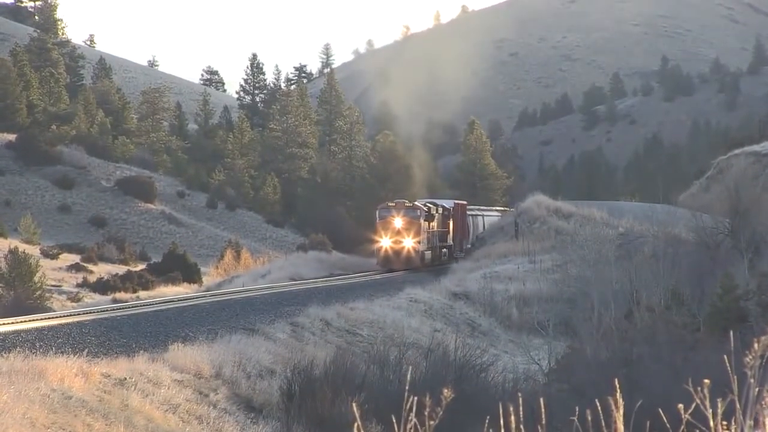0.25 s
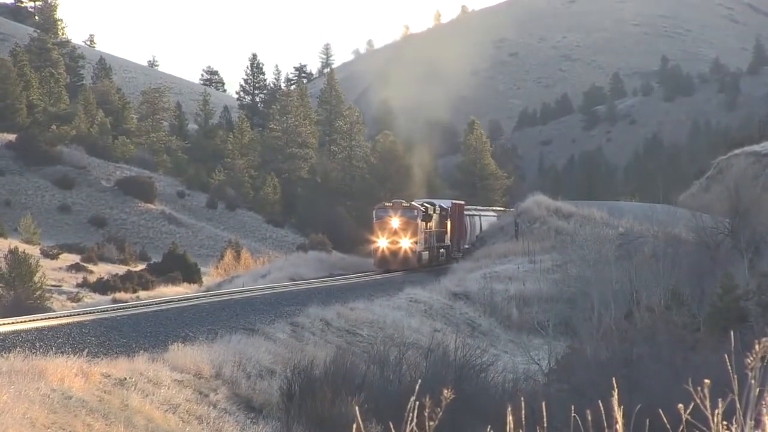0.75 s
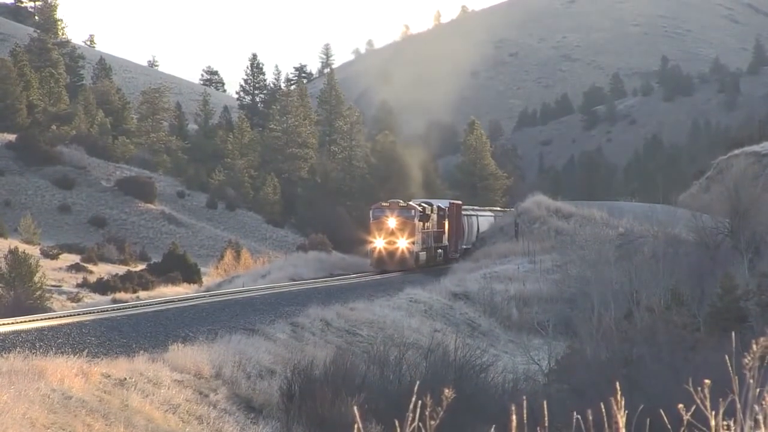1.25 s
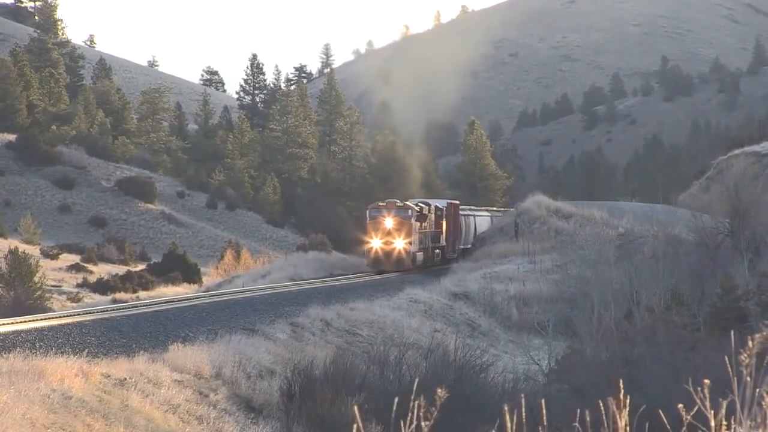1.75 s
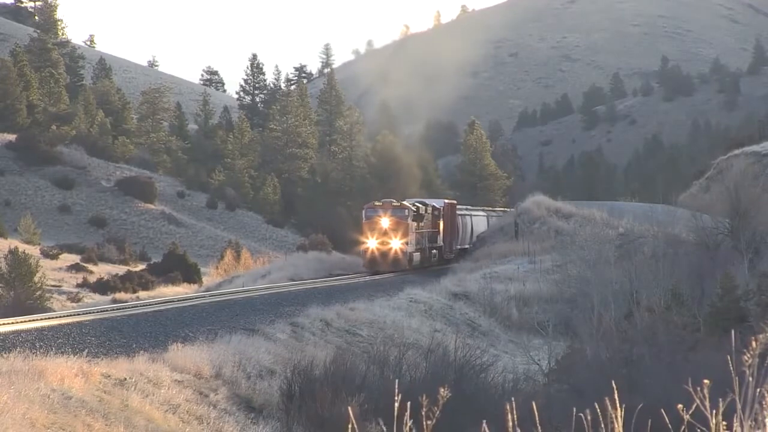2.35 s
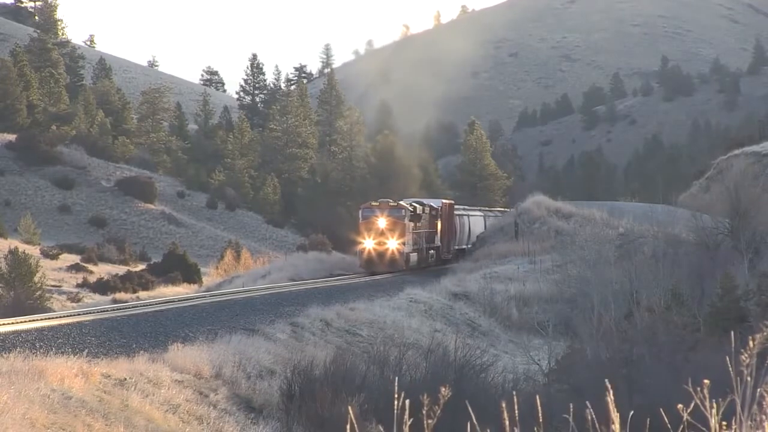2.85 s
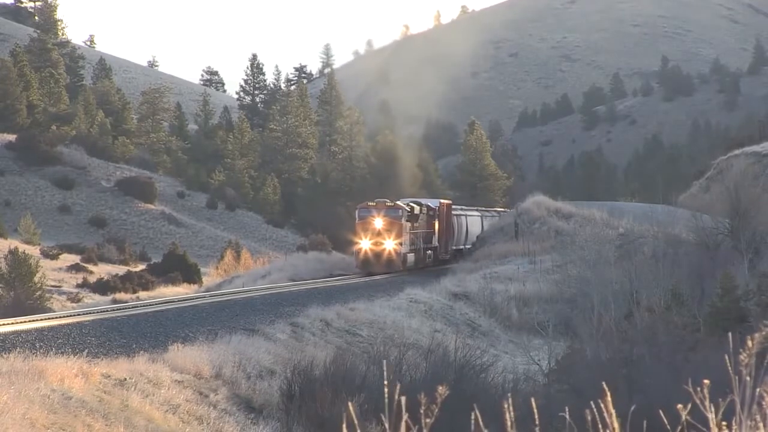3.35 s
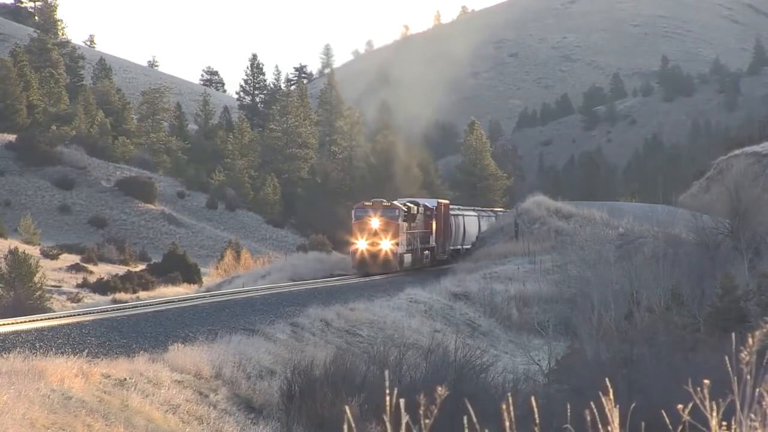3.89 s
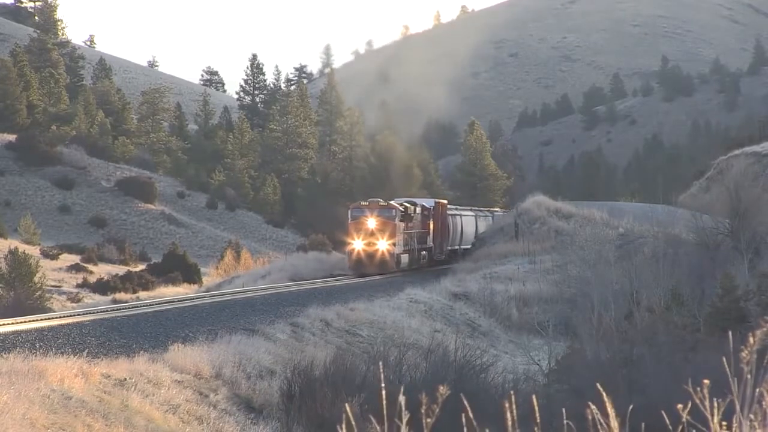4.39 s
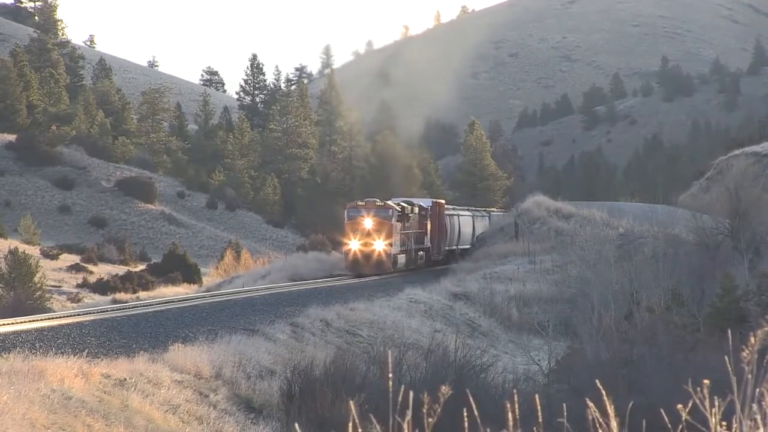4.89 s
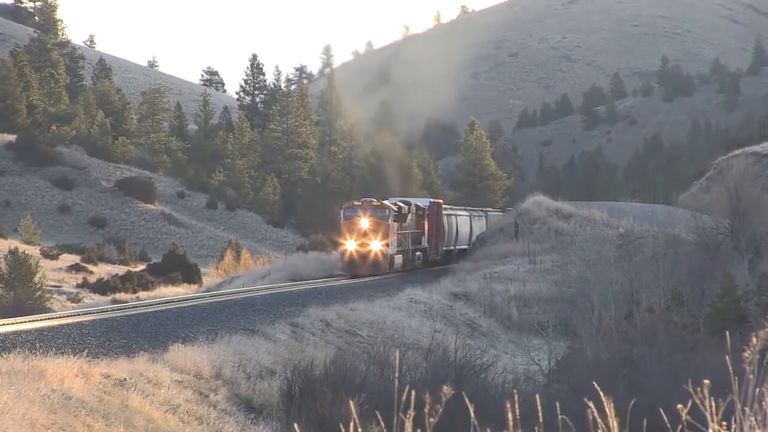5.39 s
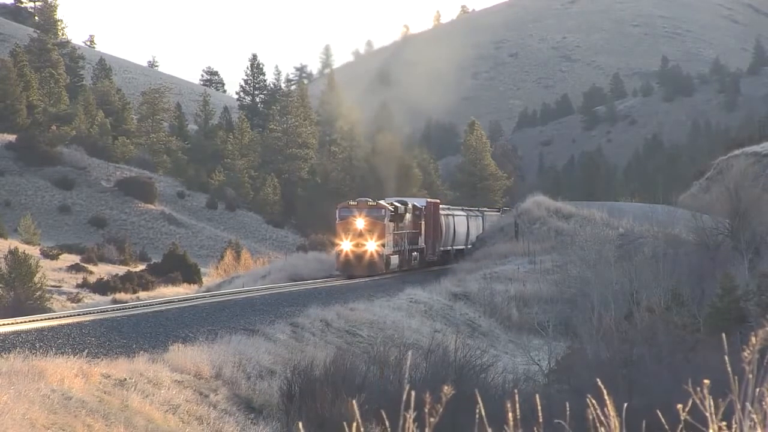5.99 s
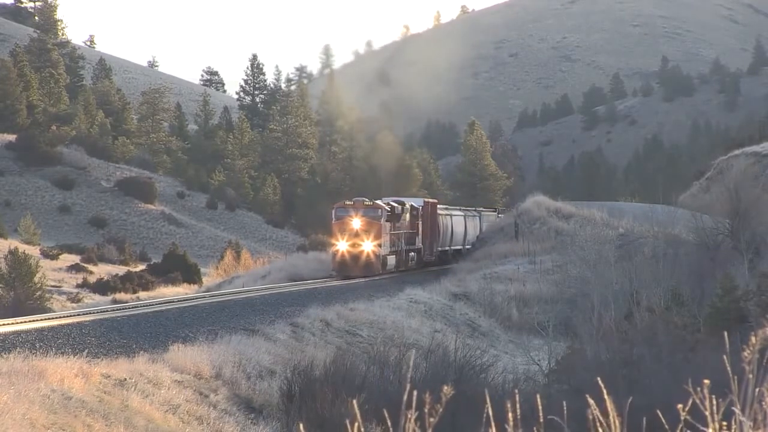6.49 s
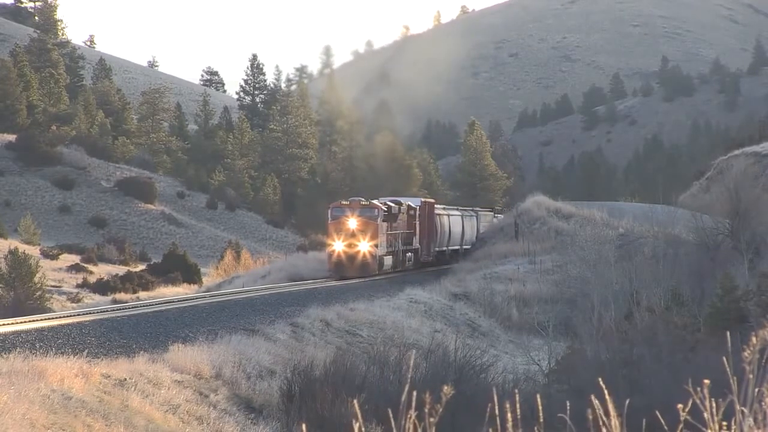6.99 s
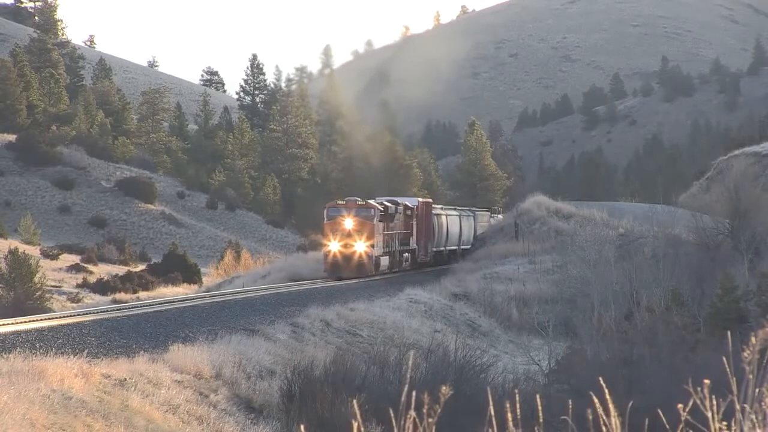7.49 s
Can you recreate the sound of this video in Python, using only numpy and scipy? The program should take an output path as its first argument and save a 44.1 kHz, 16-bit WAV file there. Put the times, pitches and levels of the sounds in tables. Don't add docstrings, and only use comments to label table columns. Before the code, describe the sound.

Fast, uneven diesel firings pulse beneath a steady low-mid roar, heard from a fixed trackside spot in open country. The train clears a cutting around three seconds and becomes fuller, then its fans turn throaty on the curve and it ends at its loudest. Faint grass brushing and small ticks fade as the breeze dies. A quick, quiet bird trill and a thin wavering turbo whistle appear over the engines, with slight microphone hiss.

```python
import sys
import numpy as np
from scipy import signal
from scipy.fft import rfft, irfft, next_fast_len
from scipy.io import wavfile
from scipy.ndimage import uniform_filter1d

SR = 44100
rng = np.random.default_rng(int(sys.argv[2]) if len(sys.argv) > 2 else 0)


def waveform_to_disk(signal):
    frames = np.transpose(np.atleast_2d(signal))
    scaled = np.clip(frames, -1, 1) * 32767
    samples = np.round(scaled).astype(np.int16)
    wavfile.write(sys.argv[1], SR, samples)


def to_linear_factor(level_db):
    exponent = np.asarray(level_db, float) / 20
    return 10 ** exponent


N = 341334
TIME = np.arange(N) / SR
PAD = next_fast_len(N + SR // 2)
FREQ = np.arange(PAD // 2 + 1) * SR / PAD + 1e-6


def curves(table):
    s, *columns = np.transpose(table)
    return [np.interp(TIME, s, c) for c in columns]


def unit(x):
    return x / np.sqrt(np.mean(x ** 2))


def through(x, response):
    return irfft(rfft(x, PAD) * response, PAD)[:N]


def noise():
    return rng.standard_normal(N)


def low_pass(hz, order):
    return 1 / (1 + (FREQ / hz) ** order)


def colour(spectrum):
    hz, db = np.transpose(spectrum)
    return to_linear_factor(np.interp(np.log(FREQ), np.log(hz), db))


def ring(hz, width):
    return 1j * FREQ * width / (hz ** 2 - FREQ ** 2 + 1j * FREQ * width)


def tone(hz):
    return np.sin(2 * np.pi * np.cumsum(hz) / SR)


def walk(rate):
    levels = rng.standard_normal(int(N / SR * rate) + 3)
    quarters = np.arange(4 * len(levels)) / 4
    ramps = uniform_filter1d(np.interp(quarters, np.arange(len(levels)), levels), size=3)
    return 1.3 * np.interp(TIME * rate * 4, np.arange(len(ramps)), ramps)


CYCLE_HZ = 8.9254
# crank angle/deg of 720, level/dB
CYLINDERS = [(57.8, 2.7), (96.5, 3.8), (174.0, -4.2), (241.3, -1.9), (287.0, -1.9), (337.3, -5.5),
             (427.4, 2.5), (479.5, -3.0), (538.2, 5.1), (576.2, 4.4), (676.1, 2.6), (706.7, -4.5)]


def firings(scatter_db, drift_db, jitter_s):
    angle, db = np.transpose(CYLINDERS)
    cycles = np.arange(int(N / SR * CYCLE_HZ) + 1)[:, None]
    chance = rng.standard_normal((len(cycles), len(angle), 3))
    drift = 2 * uniform_filter1d(chance[..., 2], size=4, axis=0)
    place = ((cycles + angle / 720) / CYCLE_HZ + jitter_s * chance[..., 0]) * SR
    size = to_linear_factor(db + scatter_db * chance[..., 1] + drift_db * drift)
    place = np.clip(place, 0, PAD - 1).astype(int)
    return np.bincount(place.ravel(), size.ravel(), PAD)[:N]


# f/Hz, width/Hz, signed gain
STACK = [(55.14, 8, -.1), (78.59, 8, -.293), (145.0, 23.7, .128), (191.1, 10.7, .037)]
# t/s, level/dB
NEARING = [
    (0, -4.5),
    (1.7, -3),
    (3.1, -0.5),
    (5.6, 0),
    (7.74, 2),
]
MIC_CUT_HZ = 40
BEAT_DB, DEEP_DB = -33, -41
DEEP_FOLLOW = .1
DRIFT_S, DRIFT_PEAK_S, DRIFT_DB = 8.2, 6.9, 1


def exhaust(pulses):
    slope = 1j * FREQ / MIC_CUT_HZ
    bass_cut = (slope ** 2 / (slope ** 2 + np.sqrt(2) * slope + 1)) ** 2
    rings = sum(gain * ring(hz, width) for hz, width, gain in STACK)
    stack = bass_cut * rings * low_pass(420, 4)
    deep = low_pass(66, 16)
    near_db = curves(NEARING)[0]
    drift_db = DRIFT_DB * np.cos(2 * np.pi * (TIME - DRIFT_PEAK_S) / DRIFT_S)
    throb = to_linear_factor(DEEP_DB + DEEP_FOLLOW * near_db + drift_db) * unit(through(pulses, stack * deep))
    beat = to_linear_factor(BEAT_DB + near_db + 1.0) * unit(through(pulses, stack * (1 - deep)))
    return throb + beat


# f/Hz, share
ROAR_FOLLOW = [(100, 0.41), (300, 0.19), (480, .8), (750, -0.5), (1200, .6), (2500, .2), (5000, -0.0058)]
# t/s, f/Hz
GROUND_DIP = [
    (0, 1048),
    (1.2, 1026),
    (2.4, 795),
    (3.3, 670),
    (5.6, 1034),
    (6.4, 1186),
    (7.74, 1237),
]
DIP_DB, DIP_OCTAVES = -1, 0.14
# t/s, f/Hz, length/s, level/dB
POCKETS = [(.45, 2600, .2, 4.5), (.2, 980, 0.45, 2), (2.2, 1150, .4, 3.5), (2.67, 3000, 0.28, 4.5),
           (3.0, 1020, 0.42, -2.5), (3.6, 2700, 0.68, -2.5), (3.5, 1500, .4, -2), (3.6, 320, .5, -0.5),
           (4.297, 4400, .5, 1), (4.85, 2800, .25, -2.5), (1.7, 3100, .4, 1.5), (6.4, 2100, .5, 1),
           (5.7, 950, 0.31, -2.5), (5.4, 1550, 0.55, 3.5), (5.2, 2400, 0.41, 1.5), (7.1, 1000, 0.76, 3),
           (7.74, 3000, .3, 4.5)]
POCKET_OCTAVES = .5


def swell(hz):
    s = TIME[::256]
    centres, shares = np.transpose(ROAR_FOLLOW)
    db = np.interp(np.log(hz), np.log(centres), shares) * np.interp(s, *np.transpose(NEARING))
    dip_hz = np.interp(s, *np.transpose(GROUND_DIP))
    db += DIP_DB * np.exp(-(np.log2(hz / dip_hz) / DIP_OCTAVES) ** 2)
    db -= db.mean()
    for at, centre, length, gain_db in POCKETS:
        octaves = np.log2(hz / centre) / POCKET_OCTAVES
        db += gain_db * np.exp(-((s - at) / length) ** 2 - octaves ** 2)
    return np.interp(TIME, s, db)


# f/Hz, level/dB per Hz
ROAR = [(40, -16), (70, -6), (150, -1), (240, 0.5), (330, -7), (520, -7.5), (750, -11.5), (950, -15),
        (1300, -22.5), (1700, -26.5), (2500, -30), (4600, -40.5), (5450, -53), (7000, -64)]


def roar(pulses, puff=.09, shimmer_db=.4, flicker_db=1.3):
    beat = unit(through(pulses - pulses.mean(), ring(40, 50)))
    gas = rfft(noise() * (1 + puff * beat), PAD) * colour(ROAR)
    octave = np.log2(FREQ / 480)
    out = np.zeros(N)
    for step in np.arange(-11, 14):
        band = np.clip(1 - abs(3 * octave - step), 0, 1)
        db = swell(480 * 2 ** (step / 3)) + shimmer_db * walk(1.5) + flicker_db * walk(4)
        out += to_linear_factor(db) * irfft(gas * band, PAD)[:N]
    return to_linear_factor(-44.5) * unit(out)


# f/Hz, width/Hz, level/dB
HUMS = [(70.3, 9.5, -53.5), (96.6, 1.5, -52), (127.8, 4.7, -60.5), (368.8, 21, -61.5), (629, 26, -66),
        (1046, 100, -68.5), (1255.5, 100, -66), (1430, 49, -71.5)]


def hums(waver_db=1.5):
    source = noise()
    out = np.zeros(N)
    for hz, width, db in HUMS:
        band = unit(through(source, ring(hz, width) ** 2))
        out += to_linear_factor(db + swell(hz) + waver_db * walk(1.2)) * band
    return out


def ground(x, share=0.34):
    late = np.interp(TIME - .5 / curves(GROUND_DIP)[0], TIME, x)
    return x + share * through(late, low_pass(1700, 4))


# t/s, f/Hz, level/dB
THROAT = [
    (0, 680, -66),
    (.7, 720, -55.5),
    (1.5, 730, -55.5),
    (2.1, 620, -65),
    (2.8, 460, -59),
    (4.6, 470, -59),
    (5.2, 560, -52.5),
    (7.74, 545, -50.5),
]


def throat(width_hz=80):
    hz, db = curves(THROAT)
    hz = hz * (1 + .05 * walk(3))
    turn = 2 * np.pi * np.cumsum(hz) / SR
    a, b = (through(noise(), low_pass(width_hz, 4)) for _ in range(2))
    return to_linear_factor(db + 0.76 * walk(6.2)) * unit(a * np.cos(turn) + b * np.sin(turn))


# f/Hz, level/dB per Hz
STEMS = [(2500, -5.5), (5000, 7.5), (8000, 2.5), (10000, -4), (12000, -1.5), (15500, -10)]
# t/s, length/s, level/dB, brightness 0-1
GUSTS = [(0, .05, -82, 0.6), (0.326, 0.19, -84, 0.35), (0.798, .12, -90.5, 0.6), (1.02, 0.06, -88, 0.5),
         (1.153, 0.1, -77.5, 0.33), (1.318, .06, -92, 0.4), (1.529, 0.12, -88.5, .4), (1.807, .1, -94, 0.8),
         (2.16, .14, -85.5, .95), (2.42, .06, -88.5, .6), (3.47, .06, -94, .5), (3.59, .09, -85, 0.8),
         (3.771, .1, -88.5, 1), (4.22, 0.1, -87.5, 0.9), (4.83, 0.05, -93, 0.5)]
# t/s, level/dB, f/Hz, width/Hz
TICKS = [(1.7841, -46, 5400, 4500), (1.7841, -46, 10500, 7000), (1.7962, -62, 7800, 2500),
         (1.7995, -52, 8000, 2200), (1.7996, -51, 13500, 6000), (1.8018, -57, 10500, 6000),
         (1.804, -62, 9000, 5000), (3.499, -65, 6800, 3000), (3.604, -68, 8000, 4000),
         (4.309, -68, 6000, 3000), (4.84, -68, 7500, 3000), (5.866, -63, 9300, 1200),
         (6.93, -65, 9000, 2200)]
CALM_DB, CALM_BRIGHT = -102, 0.5
BREEZE_DB, BREEZE_S = 8, 2.4


def grass(crackle_db=2.0):
    crackle = to_linear_factor(crackle_db * rng.exponential(size=N))
    grains = unit(through(noise() * crackle, colour(STEMS)))
    t = TIME[::64]
    gains = np.array([to_linear_factor(db - 10 * ((t - s) / length) ** 2) for s, length, db, _ in GUSTS])
    calm = to_linear_factor(CALM_DB + BREEZE_DB * np.exp(-(t / BREEZE_S) ** 4))
    gain = calm + gains.sum(axis=0)
    bright = (calm * CALM_BRIGHT + np.transpose(GUSTS)[-1] @ gains) / gain
    gain, bright = np.interp(TIME, t, gain), np.interp(TIME, t, bright)
    thick = through(grains, low_pass(7500, 8))
    out = gain * to_linear_factor(7.5 + 1.2 * walk(25)) * (grains - np.clip(bright, 0, 1) * thick)
    after = np.arange(256) / SR
    for s, db, hz, width in TICKS:
        start = int(s * SR)
        decay = np.exp(-np.pi * width * .5 * after)
        out[start:start + 256] += to_linear_factor(db) * decay * np.sin(2 * np.pi * hz * after)
    return out


def peak(s, length, db):
    return to_linear_factor(db - 10 * abs(TIME - s) / length)


TURBO_HZ, TURBO_DB = 1481.5, -86
# t/s, length/s, level/dB
GLINTS = [
    (0.696, .35, -72.5),
    (1.898, .7, -76.5),
    (2.69, 0.1, -64.5),
    (4.498, 0.53, -65),
    (5.496, 0.67, -69.5),
    (7.003, 1.6, -71.5),
]


def turbo():
    hz = TURBO_HZ + 4 * walk(5)
    gain = to_linear_factor(TURBO_DB) + sum(peak(*row) for row in GLINTS)
    return np.sqrt(2) * gain * to_linear_factor(2.0 * walk(6.4)) * tone(hz)


# t/s, start f/Hz, end f/Hz, length/s, level/dB
LEAD_IN = (2.670, 6550, 7700, .028, -80)
# t/s, level/dB
NOTES = [
    (2.804, -83),
    (2.894, -87),
    (2.984, -79),
    (3.071, -77),
    (3.162, -79),
    (3.256, -75),
    (3.347, -75),
    (3.440, -77),
]
NOTE_HZ, NOTE_S = (7570, 5100), .031


def bird():
    out = np.zeros(N)
    for s, start_hz, end_hz, length, db in [LEAD_IN] + [(s, *NOTE_HZ, NOTE_S, db) for s, db in NOTES]:
        part = np.arange(int(length * SR)) / (length * SR)
        hz = start_hz + (end_hz - start_hz) * (part + part ** 2) / 2
        breath = np.sin(np.pi * part ** 1.3) ** 1.4
        start = int(s * SR)
        out[start:start + len(part)] = to_linear_factor(db + 4) * breath * tone(hz)
    return out


def scene():
    pulses = firings(scatter_db=.5, drift_db=.9, jitter_s=.00012)
    train = exhaust(pulses) + ground(roar(pulses) + hums()) + throat()
    return (train + grass() + turbo() + bird())[None]


def band_limit(x):
    return signal.sosfilt(signal.butter(12, 15720, fs=SR, output="sos"), x)


# f/Hz, level/dB per Hz
HISS = [(2000, 2), (7000, 2), (11500, 0.5), (12500, 0), (16000, -6.5)]
HISS_DB = -84


def record(dry):
    hiss = to_linear_factor(HISS_DB) * unit(through(noise(), colour(HISS)))
    return band_limit(dry + hiss)


dry = scene()
out = record(dry)
waveform_to_disk(out)
```